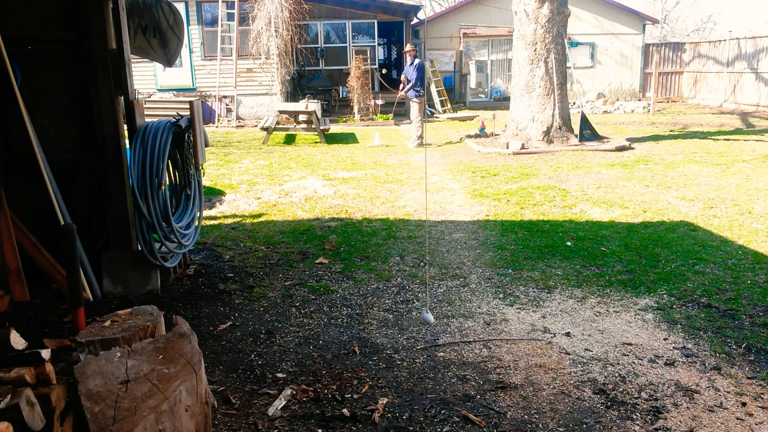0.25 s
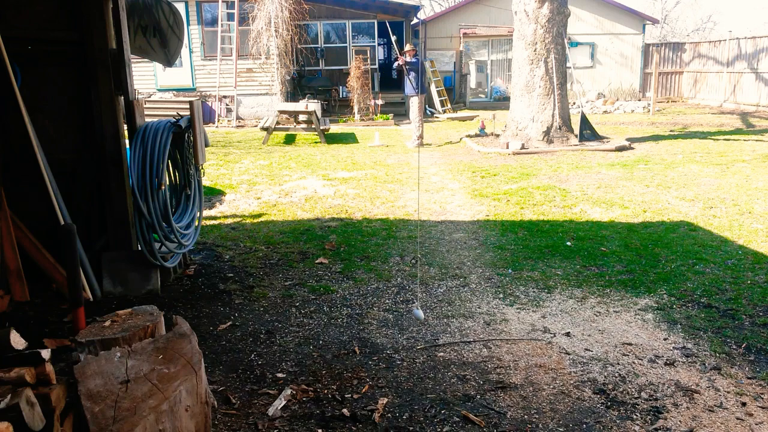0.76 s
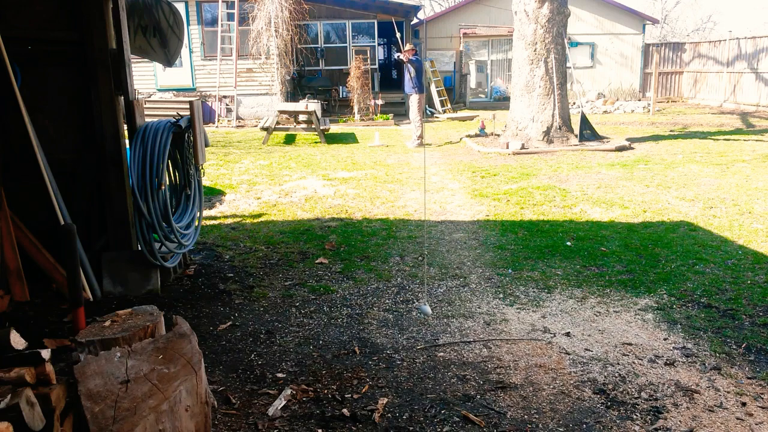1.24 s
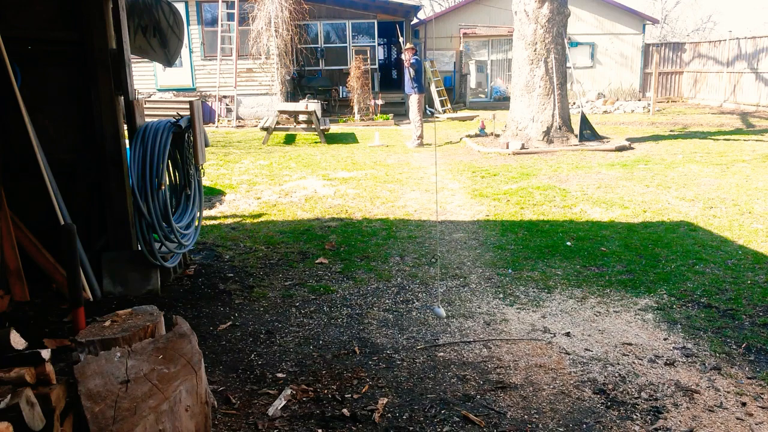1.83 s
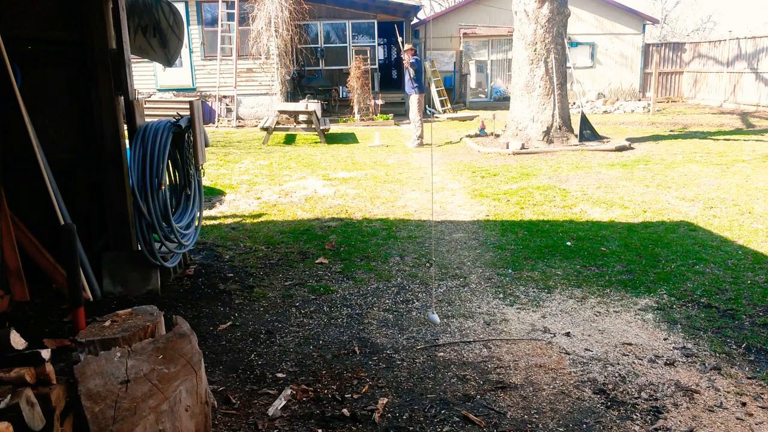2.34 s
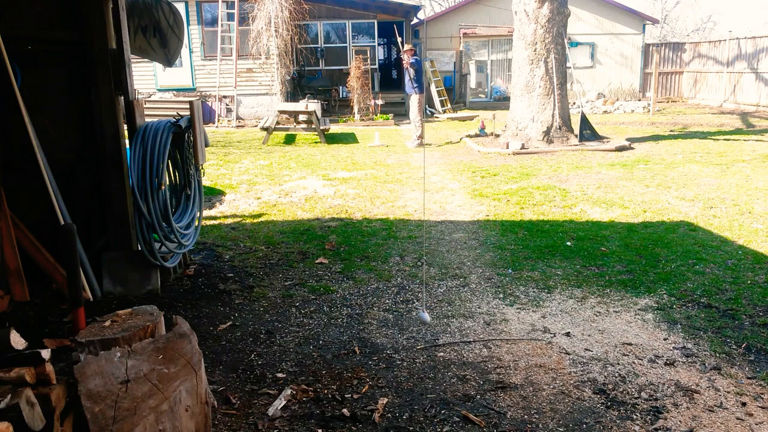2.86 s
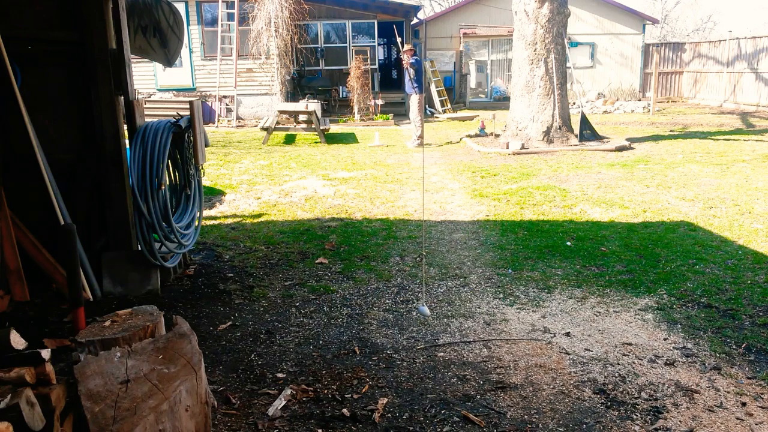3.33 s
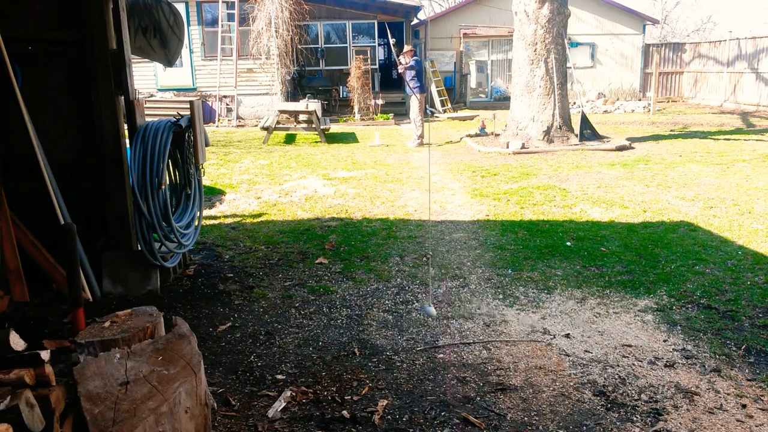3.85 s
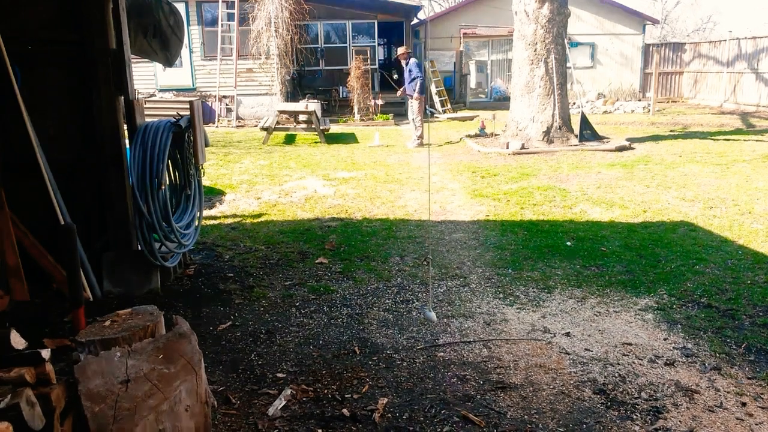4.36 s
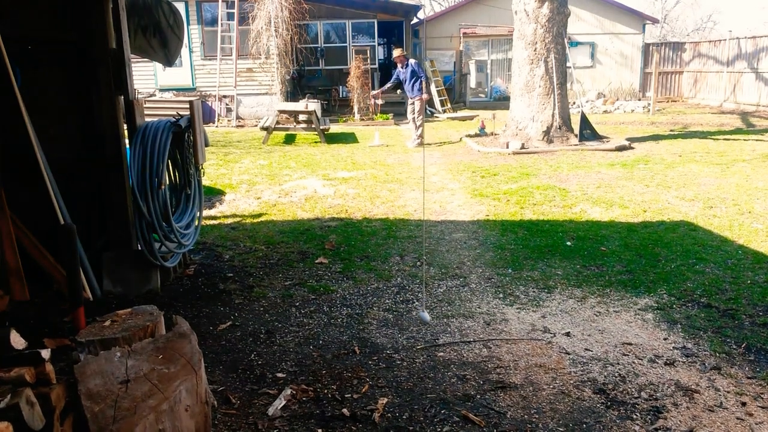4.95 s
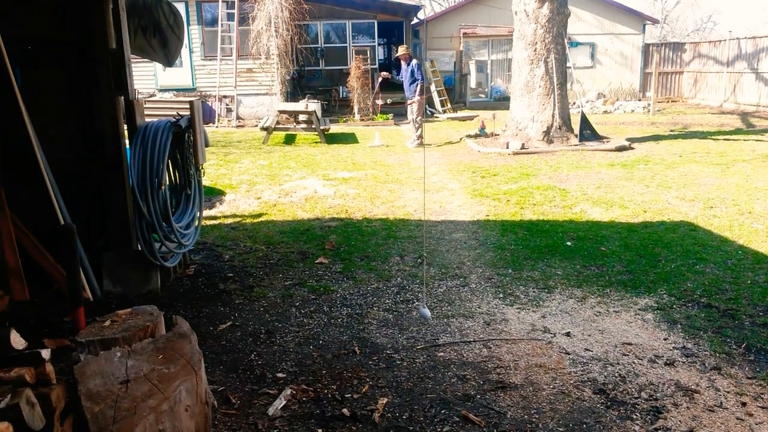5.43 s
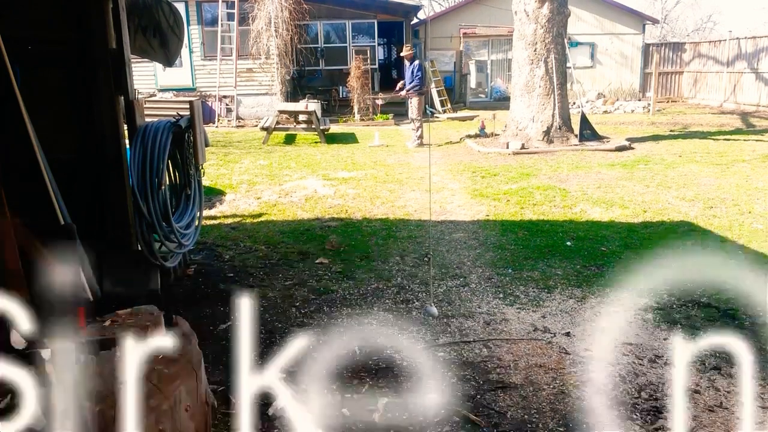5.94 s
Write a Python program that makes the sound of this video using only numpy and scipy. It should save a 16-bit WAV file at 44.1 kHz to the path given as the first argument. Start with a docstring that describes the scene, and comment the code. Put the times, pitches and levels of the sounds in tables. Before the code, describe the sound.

Faint birdsong in a yard, then a bow release, a quick hissing arrow flight and a sharp, close smack into a rattling target.

```python
"""Birds whistle and rasp in a backyard over a faint town rumble. At 3.77 s a far bow snaps and an arrow
flies closer, its feathers hissing, its air tones pulsing as the shaft flexes. At 3.95 s the point smacks
into a hanging target close by, at the mouth of a shed; the shaft buzzes and the shed rings.
The swinging target thumps, ticks and rustles until it settles. A small knock comes from across the yard,
and the birds call on."""
import sys
import numpy as np
from scipy import signal
from scipy.fft import rfft, irfft, next_fast_len
from scipy.io import wavfile
from scipy.ndimage import map_coordinates

SR = 44100
rng = np.random.default_rng(int(sys.argv[2]) if len(sys.argv) > 2 else 0)


def bounce(signal):
    """Save signal as a 16-bit WAV file at the path given by the first command-line argument."""
    frames = np.transpose(np.atleast_2d(signal))
    limited = np.clip(frames, -1, 1)
    pcm = np.round(limited * 32767).astype(np.int16)
    wavfile.write(sys.argv[1], SR, pcm)


N = 273175
T = np.arange(N) / SR
LOOSE_S, HIT_S = 3.772, 3.954


def amp(db):
    """Decibels to gain."""
    return 10 ** (np.asarray(db) / 20)

def along(points, hz):
    """Interpolate (Hz, value) points on a log axis."""
    freqs, values = np.transpose(points)
    return np.interp(np.log(hz + 1), np.log(freqs + 1), values)

def wobble(rate):
    """Smooth random curve, rate knots a second."""
    return map_coordinates(rng.standard_normal(int(N * rate / SR) + 4), [T * rate])

def filtered(x, response):
    """Apply a frequency response."""
    size = next_fast_len(N + 8192)
    return irfft(rfft(x, size) * response(np.fft.rfftfreq(size, 1 / SR)), size)[..., :N]

def fade(start, t60, attack=.00055):
    """Envelope of a blow; times in seconds."""
    age = np.maximum(T - start, 0)
    return amp(-60 * age / t60) * (1 - np.exp(-age / attack))

def gate(start, end, attack, t60):
    """Attack, hold until the end, release."""
    return np.clip((T - start) / attack, 0, 1) * amp(-60 * np.maximum(T - end, 0) / t60)

def swells(rows):
    """Gaussian rises and falls of gain."""
    return sum(amp(db) * np.exp(-((T - peak_s) / half_s) ** 2) for peak_s, half_s, db in rows)

def pan(db):
    """Stereo gains, left over right by db."""
    return amp([[db / 2], [-db / 2]])

def tone(hz, drift, rate):
    """Stereo tone of rms 1 whose phase wanders apart at the two sides."""
    phase = 2 * np.pi * np.cumsum(hz * np.ones(N)) / SR
    return np.sqrt(2) * np.sin(phase + drift * np.array([wobble(rate), wobble(rate)]))

# Stereo coherence. Each row: frequency in Hz, left-right correlation.
COHERENCE = [(25, .4), (60, 1), (240, 0.92), (480, .62), (950, 0), (2400, .1), (10000, 0)]
def noise(spectrum):
    """Stereo noise of rms 1, alike in the bass and unrelated in the treble."""
    def response(hz):
        angle = np.arccos(np.clip(along(COHERENCE, hz), -1, 1)) / 2
        return amp(along(spectrum, hz)) * [np.cos(angle), np.sin(angle)]
    mid, side = filtered(rng.standard_normal((2, N)), response)
    stereo = np.array([mid + side, mid - side])
    return stereo / np.sqrt(np.mean(stereo ** 2) + 1e-20)

# Yard reverberation. Each row: frequency in Hz, t60 in seconds.
YARD_DECAY = [(100, .6), (400, .4), (2000, 0.605), (7000, 0.51), (14000, .38)]
def yard_echo(x):
    """Walls and fences answer, each frequency dying at its own speed."""
    hz, t, bins = signal.stft(rng.standard_normal((2, SR)), SR, nperseg=256)
    decay = amp(-60 * t / along(YARD_DECAY, hz)[:, None])
    tail = signal.istft(bins * decay, SR, nperseg=256)[1]
    return signal.fftconvolve(x, tail / np.linalg.norm(tail[0]), axes=1)[:, :N]

def shed_boards(x, count=9):
    """Weak early reflections off the boards comb the sound differently at each side."""
    delays_s = rng.uniform(.002, .028, (2, count, 1))
    comb = lambda hz: 1 + amp(-17.5) * np.exp(-2j * np.pi * hz * delays_s).sum(axis=1)
    return filtered(x, comb) / np.sqrt(1 + count * amp(-14.5) ** 2)

# Background spectra. Each row: frequency in Hz, relative density in dB.
RUMBLE_SPECTRUM = [(25, -19.5), (40, -9.5), (65, -1), (170, -2), (260, -4), (400, -10.5), (500, -9.5),
                   (850, -8.5), (1400, -18.5), (2000, -32.5), (4000, -70)]
TRAFFIC_SPECTRUM = [(120, -27.5), (210, -7), (255, 1.5), (300, -8.5), (355, -4), (450, -22), (900, -45.5)]
AIR_SPECTRUM = [(900, -17), (1500, -2), (2500, -1.5), (5300, -4.5), (7100, 1), (9000, -4), (14000, -10.5),
                (15500, -15)]
# Background swells. Each row: peak time in seconds, half length in seconds, level in dB.
TRAFFIC_SWELLS = [(.1, 0.1, -58), (5.1, 0.718, -58.5), (6.19, .17, -65)]
HUM_SWELLS = [(2.42, .5, -68.5), (4.9, 1.1, -67.5)]
def town():
    """Distant rumble and a smooth hiss; a traffic drone and a faint hum swell and fade."""
    rumble = amp(-58 + .38 * wobble(11)) * noise(RUMBLE_SPECTRUM)
    traffic = (amp(-76.5) + swells(TRAFFIC_SWELLS)) * noise(TRAFFIC_SPECTRUM)
    hum = (amp(-77.5) + swells(HUM_SWELLS)) * tone(hz=421, drift=1, rate=3.9)
    return rumble + traffic + hum + amp(-65) * noise(AIR_SPECTRUM)

def arch(start, length):
    """Rounded envelope of a bird's note."""
    progress = np.clip((T - start) / length, 0, 1)
    return 2 * np.sqrt(progress * (1 - progress))

def syrinx(hz, harmonics_db=(0,), waver=.012):
    """A bird's voice: harmonics of a quickly wavering pitch."""
    phase = 2 * np.pi * np.cumsum(hz * (1 + waver * wobble(300))) / SR
    return sum(amp(db) * np.sin(k * phase) for k, db in enumerate(harmonics_db, 1))

# Near whistles. Each row: start in seconds, length in seconds, pitch in Hz, glide as a share of pitch,
# level in dB, left over right in dB.
NEAR_NOTES = [(0.172, 0.03, 4160, 0.064, -61.5, 15), (.245, 0.032, 7030, .06, -57.5, 7),
              (1.03, 0.049, 4282, -0.006, -59.5, 2), (1.107, .17, 5840, 0, -72, 12),
              (1.236, .052, 3770, .01, -70, 9), (1.645, .045, 1970, -0.072, -62.5, 0),
              (1.95, .035, 3440, .02, -67, 4), (1.784, .17, 2680, -0.056, -64.5, 3),
              (2.096, 0.085, 4250, .03, -67, 3), (4.049, 0.255, 2650, -.016, -58.5, 2),
              (4.292, .245, 2614, -0.016, -60, 3), (4.099, .115, 6990, .03, -49, 15),
              (4.341, 0.18, 7090, 0.035, -57, 3), (5.166, 0.083, 4160, 0, -61.5, 8)]
def bird_notes(far_count=8):
    """Thin gliding whistles: near ones, and a scatter of faint ones farther off."""
    far_notes = [(.1 + 2 * when, .09, 3000 + 7000 * pitch, .041 * (bend - .5), -76.5, 3)
                 for when, pitch, bend in rng.random((far_count, 3))]
    song = np.zeros((2, N))
    for start, length, hz, glide, db, side_db in NEAR_NOTES + far_notes:
        sweep = np.clip((T - start) / length, 0, 1) - .5
        song += pan(side_db) * amp(db) * arch(start, length) * syrinx(hz * (1 + glide * sweep))
    return song

# Rising calls. Each row: start in seconds, length in seconds, pitch factor, level in dB.
SLUR_CALLS = [(1.975, 0.27, 1.02, -57), (3.595, 0.46, 1.05, -58), (5.907, 0.28, 1, -54.5)]
# Pitch contour. Each row: time into the call in seconds, base pitch in Hz.
SLUR_CONTOUR = [(0, 3124), (.05, 3370), (.12, 3697), (.19, 3760), (.26, 3784)]
# Timbre. Each entry: relative level of a harmonic in dB.
SLUR_HARMONICS_DB = [-19.5, -1.5, -19.5, -23]
def bird_slurs():
    """One bird repeats a rising call."""
    song = np.zeros(N)
    for start, length, factor, db in SLUR_CALLS:
        hz = factor * np.interp(T - start, *np.transpose(SLUR_CONTOUR))
        song += amp(db) * arch(start, length) ** 2 * syrinx(hz, SLUR_HARMONICS_DB)
    return song

# Timbre. Each entry: level of a harmonic in dB.
CRY_HARMONICS_DB = [-81, -73.5, -73]
def bird_cry(start_s=2.76, length_s=.34, base_hz=1490, rise_db=1):
    """A long thin cry from the left, arching in pitch and swelling slightly."""
    shape = arch(start_s, length_s)
    effort = amp(rise_db * np.clip((T - start_s) / length_s, 0, 1))
    voice = syrinx(base_hz * (1 + .026 * shape), CRY_HARMONICS_DB, waver=.0052)
    return pan(5) * shape * effort * voice

# Harsh bird calls, and one brief high rustle of the settling target at 4.39 s.
# Each row: peak time in seconds, half length in seconds, centre in Hz, level in dB.
RASP_SWELLS = [(.28, .04, 4400, -69), (0.953, .17, 7000, -68), (1.807, .2, 2100, -69.5),
               (2.162, .125, 2950, -61.5), (2.815, .018, 2900, -58.5), (2.833, 0.045, 7100, -65.5),
               (3.422, .06, 7100, -69), (4.38, .13, 2620, -65.5), (4.392, 0.045, 8260, -61.5),
               (4.83, .11, 3500, -64), (5.3, .08, 5900, -63), (6.074, 0.091, 3200, -70.5)]
# Their hiss. Each row: frequency in Hz, relative density in dB.
RASP_SPECTRUM = [(1200, -30), (2000, -8.5), (2900, 0.5), (4000, -7), (5500, -11.5), (7200, 0),
                 (9000, -10.5), (15000, -19)]
def rasps_and_rustle():
    """Bird rasps and one target rustle, each a wildly shaking pitch inside a broad hiss."""
    phase_per_hz = 2 * np.pi * np.cumsum(1 + .14 * wobble(1500)) / SR
    hiss = noise(RASP_SPECTRUM)
    return sum(swells([(peak_s, half_s, db)]) * (np.sin(hz * phase_per_hz) + hiss)
               for peak_s, half_s, hz, db in RASP_SWELLS)

def birds_and_rustle():
    """The calls and the one rustle flutter in level; the tonal calls echo round the yard."""
    song = bird_notes() + bird_slurs() + bird_cry()
    flutter = amp(2.5 * wobble(90))
    return shed_boards(flutter * (song + rasps_and_rustle())) + amp(-4.5) * yard_echo(song)

def far_knock(start_s=5.335):
    """One small dry knock from across the yard."""
    spectrum = [(300, -8), (1100, 4), (2500, -9), (4200, -4), (7200, -4), (10000, -8), (15500, -22)]
    return amp(-49.5) * fade(start_s, t60=.087, attack=.0019) * noise(spectrum)

# Target thumps. Each row: start in seconds, level in dB, t60 in seconds.
SWING_THUMPS = [(3.956, -31, 0.26), (4.019, -35.5, .12), (4.159, -34.5, 0.1), (4.324, -40, 0.13)]
# Main ticks. Each row: start in seconds, level in dB.
SWING_TICKS = [(4.0665, -32), (4.0903, -27.5), (4.198, -37), (4.215, -39.5), (4.2304, -36.5),
               (4.236, -31.5), (4.251, -42.5), (4.524, -48), (4.6145, -40), (4.661, -40), (4.68, -47)]
# Ticks and rustle. Each row: frequency in Hz, relative density in dB.
TICK_SPECTRUM = [(880, -57.5), (1500, -21.5), (2640, -14), (3000, -14.5), (3470, -11), (5600, -12.5),
                 (7220, -1.5), (9490, -13), (15500, -19)]
def target_swing(thump_hz=135, settle_s=4.38, rest_s=5.0, count=9, fall_db_per_s=20):
    """The jolted, hanging target thumps, ticks and rustles as it settles."""
    thumps = sum(amp(db) * fade(start, t60, attack=.005) * np.sin(2 * np.pi * thump_hz * (T - start))
                 for start, db, t60 in SWING_THUMPS)
    starts = settle_s + (rest_s - settle_s) * (np.arange(count) + rng.random(count)) / count
    small_ticks = [(start, -47 - fall_db_per_s * (start - settle_s)) for start in starts]
    ticks = sum(amp(db) * fade(start, t60=.034, attack=.001) for start, db in SWING_TICKS + small_ticks)
    rustle = amp(-54.5 + 4 * wobble(250)) * fade(HIT_S, t60=5, attack=.1)
    return thumps + (ticks + rustle) * noise(TICK_SPECTRUM)

# Shed response. Each row: frequency in Hz, relative density in dB.
SHED_SPECTRUM = [(40, -28), (125, -9), (300, -9), (560, -14), (1500, -23.5), (2100, -20.5), (5600, -19.5),
                 (7200, -14.5), (9500, -25.5), (15500, -35)]
def shed_ring():
    """The smack rings on in the shed, with a longer low boom."""
    ring = amp(-24 + 1.1 * wobble(200)) * fade(HIT_S, t60=.57, attack=.023) * noise(SHED_SPECTRUM)
    boom_spectrum = [(28, -11.5), (60, -8), (110, 4), (170, -1.5), (350, -8), (900, -28.5), (2500, -68.5)]
    boom = amp(-40) * fade(HIT_S, t60=1.9, attack=.021) * noise(boom_spectrum)
    return ring + boom

# Bow snaps. Each row: start in seconds, level in dB, t60 in seconds, attack in seconds.
BOW_SNAPS = [(3.755, -31, 0.083, 0.0087), (3.772, -16, 0.047, 0.005), (3.776, -22.5, .03, .001),
             (3.814, -21, 0.094, 0.0036)]
# String and limbs. Each row: frequency in Hz, relative density in dB.
BOW_SPECTRUM = [(35, -27), (70, -10.5), (150, -3), (400, -15), (950, -4.5), (1600, -15), (4300, -7),
                (5700, -11.5), (7300, 0), (8500, -15.5), (15500, -25)]
def bow():
    """The string slips and slaps the limbs; the house wall returns the snap."""
    snaps = sum(amp(db) * fade(start, t60, attack) for start, db, t60, attack in BOW_SNAPS)
    return snaps * noise(BOW_SPECTRUM)

def nearness(speed_m_per_s=88, closest_m=2.7, diffuse_db=-11.5):
    """Gain of the flying arrow: direct sound as 1 / distance, over constant scatter from the yard."""
    distance_m = np.hypot(closest_m, speed_m_per_s * np.maximum(HIT_S - T, 0))
    return np.hypot(closest_m / distance_m, amp(diffuse_db))

# Feather hiss. Each row: frequency in Hz, relative density in dB.
FEATHER_SPECTRUM = [(50, -33.5), (110, -17), (220, -14.5), (520, -20.5), (1100, -15.5), (2400, -17),
                    (4200, -14.5), (5700, -14), (7100, -6), (8100, -11), (9500, -19.5), (15500, -27.5)]
def feathers():
    """Feathers hiss louder as the arrow nears."""
    flying = gate(LOOSE_S, HIT_S, attack=.008, t60=.17)
    return flying * nearness() * amp(-19.5 + wobble(150)) * noise(FEATHER_SPECTRUM)

# Air tones. Each row: mid-flight pitch in Hz, relative level in dB, swell time in seconds.
AIR_TONES = [(992, -.5, 3.887), (1374, -6, 3.912), (672, -12, 3.935), (1812, -14.5, 3.875),
             (2890, -17.5, 4.2)]
def arrow_whistle(flex_hz=19.5, sag_per_s=.22, swell_half_s=.034):
    """The air tones pulse as the shaft flexes, swell in turn and sink as the arrow slows."""
    speed_ratio = 1 - sag_per_s * (np.clip(T, LOOSE_S, HIT_S) - (LOOSE_S + HIT_S) / 2)
    tones = np.zeros((2, N))
    for hz, db, peak_s in AIR_TONES:
        pulse_db = 4.5 * np.cos(2 * np.pi * flex_hz * (T - peak_s))
        swell_db = 7.5 * np.exp(-((T - peak_s) / swell_half_s) ** 2)
        gain = amp(db + pulse_db + swell_db + .8 * wobble(40))
        tones += gain * tone(hz * speed_ratio, drift=.3, rate=45)
    return amp(-35) * gate(LOOSE_S, HIT_S, attack=.05, t60=.12) * nearness() * tones

# Shaft rattle. Each row: frequency in Hz, relative density in dB.
RATTLE_SPECTRUM = [(88, -36.5), (150, -0.5), (668, -7), (1370, -9), (1630, -18.5), (2060, -7),
                   (2310, -10.5), (3150, -7.5), (3540, -12.5), (6980, -3), (8640, -5.5), (13800, -15),
                   (15500, -20.5)]
def shaft_buzz(length_s=.045, t60_s=.24, swing_hz=51, squeal_hz=2130, sag_hz_per_s=2500):
    """The shaft rattles in the hole, with a sinking squeal at each swing, until friction stops it."""
    age = np.clip(T - HIT_S, 0, 2 * length_s)
    shaking = gate(HIT_S, HIT_S + length_s, attack=.001, t60=.02) * amp(-60 * age / t60_s)
    rattle = amp(-11.5 + 1.2 * wobble(500)) * noise(RATTLE_SPECTRUM)
    swings = amp(-25 + 6 * np.cos(2 * np.pi * swing_hz * age)) * np.minimum(age * swing_hz, 1)
    squeal = swings * tone(squeal_hz - sag_hz_per_s * age, drift=.4, rate=140)
    return shaking * (rattle + squeal)

# Target and shaft modes. Each row: frequency in Hz, relative level in dB, t60 in seconds.
TARGET_MODES = [(104, -40, .7), (142.7, -34.5, 0.83), (250.7, -22.5, 0.17), (320, -21, 0.061),
                (466, -20.5, .12), (655.5, -18, .12)]
SHAFT_MODES = [(3840, -21, 0.1), (4930, -27, 0.084), (6200, -18, .12), (6270, -18.5, .12),
               (7140, -16.5, 0.098), (7180, -14.5, .11), (7450, -27, 0.25), (7700, -20, .14),
               (8060, -25.5, 0.3)]
def impact(push_s=3.9551, push_width_s=.00072):
    """The point pierces the skin and shoves the target once, then the shaft cracks in; both ring."""
    pierce_s, bite_s = HIT_S - .0005, HIT_S + .0026
    offset = (T - push_s) / push_width_s
    push = amp(-6.5) * (1 - 2 * offset ** 2) * np.exp(-offset ** 2)
    body = sum(amp(db) * fade(HIT_S, t60, attack=.0044) * np.sin(2 * np.pi * hz * (T - HIT_S))
               for hz, db, t60 in TARGET_MODES)
    shaft = sum(amp(db) * fade(bite_s, t60) * tone(hz, drift=.5, rate=40) for hz, db, t60 in SHAFT_MODES)
    blows = amp(-12) * fade(pierce_s, t60=.011) + amp(-1.5) * fade(bite_s, t60=.036)
    crack = blows * noise([(2000, -24.5), (4000, -14.5), (5500, -15), (6400, -2.5), (7000, -1.5),
                           (7900, -17), (15000, -29.5)])
    return push + body + pan(5.2) * (amp(-4) * shaft + crack)

def scene():
    """The shot and the settling target in the yard; the shot's highest treble leans right."""
    settling = target_swing()
    shot = bow() + arrow_whistle() + impact() + shed_boards(feathers() + shaft_buzz() + shed_ring())
    left_db = lambda hz: along([(1500, -.5), (3000, 1), (7500, 1), (11000, -3)], hz)
    shot = filtered(shot, lambda hz: amp([left_db(hz) / 2, -left_db(hz) / 2]))
    return shot + settling + amp(-15) * yard_echo(settling) + far_knock() + birds_and_rustle() + town()

def record(dry):
    """The smack just clips; a steep low-pass follows."""
    ceiling, top_hz = .82, 15750
    return filtered(np.clip(dry, -ceiling, ceiling), lambda hz: hz < top_hz)


dry = scene()
out = record(dry)
bounce(out)
```